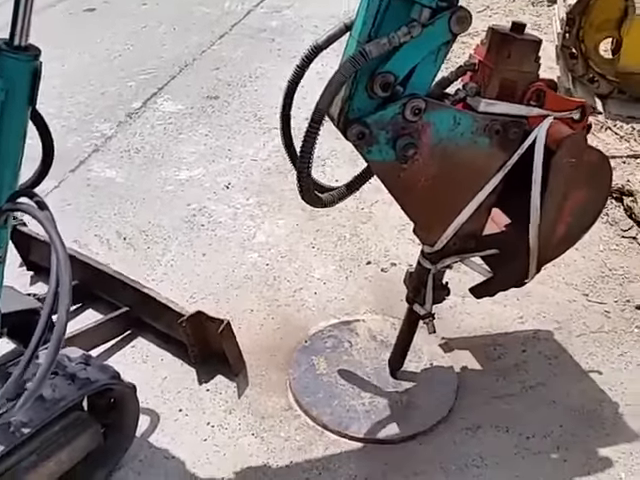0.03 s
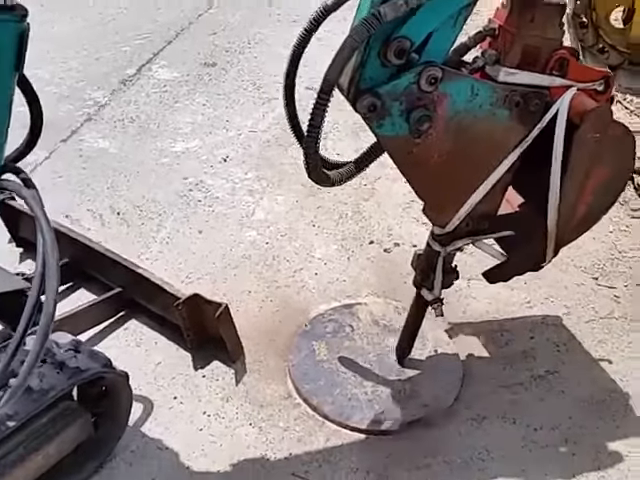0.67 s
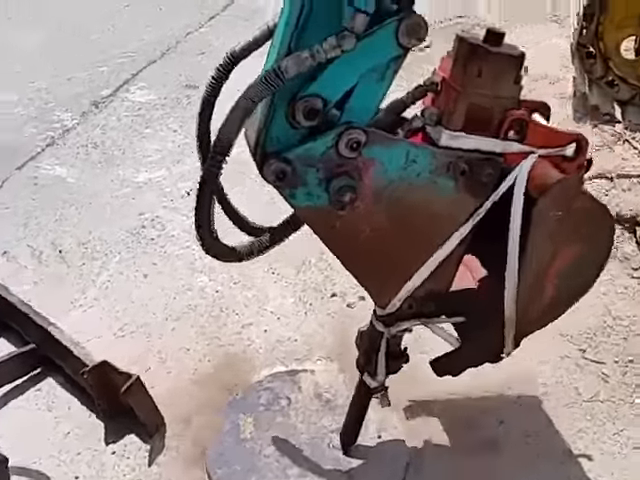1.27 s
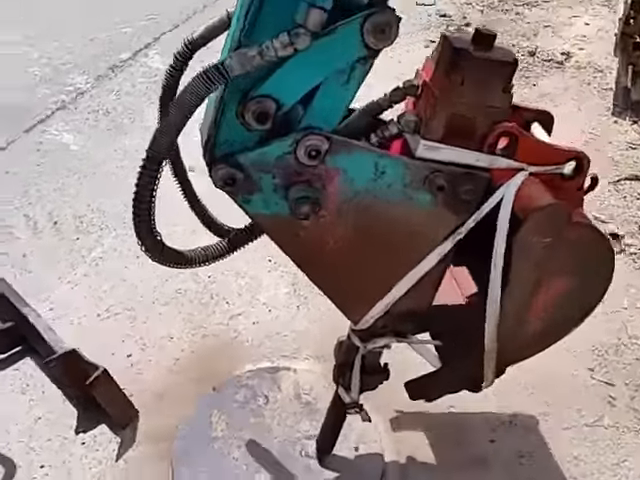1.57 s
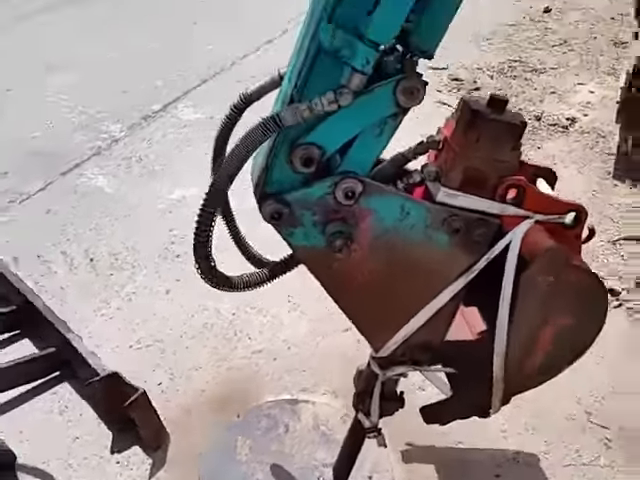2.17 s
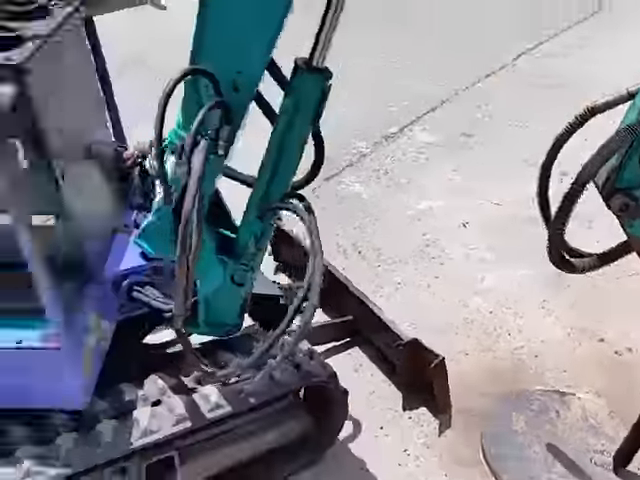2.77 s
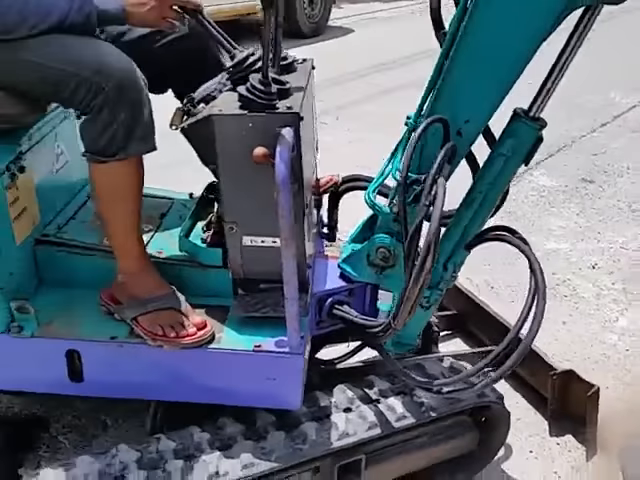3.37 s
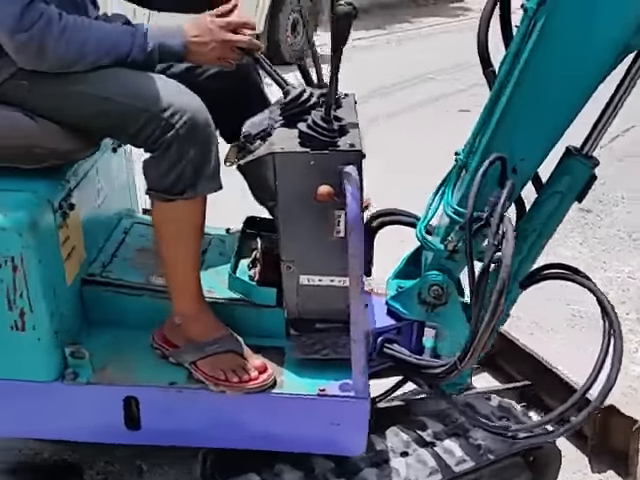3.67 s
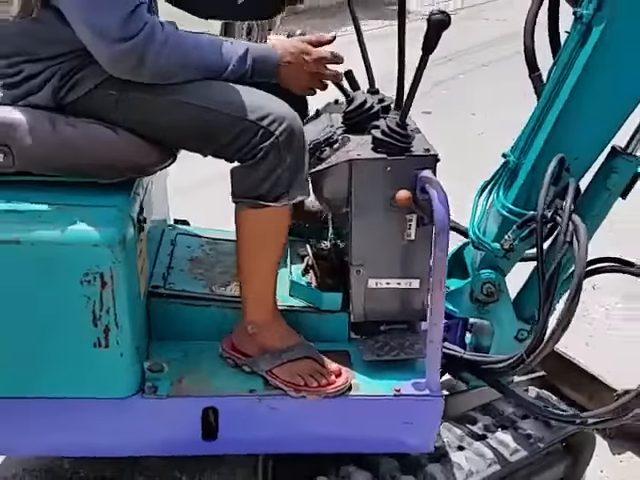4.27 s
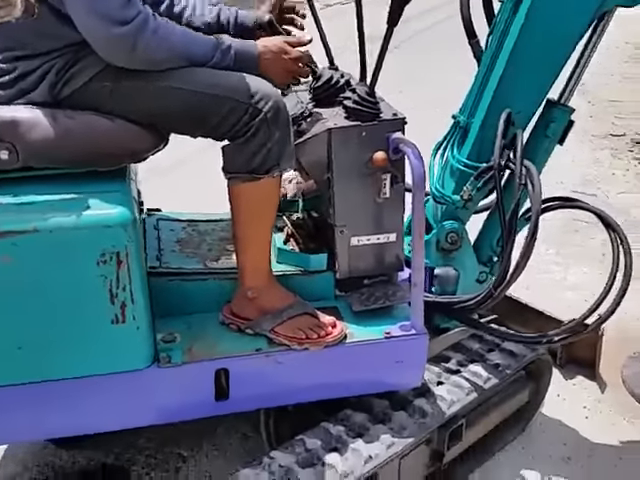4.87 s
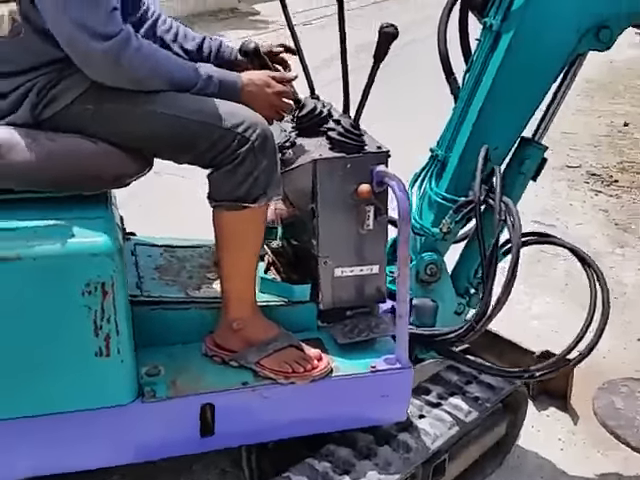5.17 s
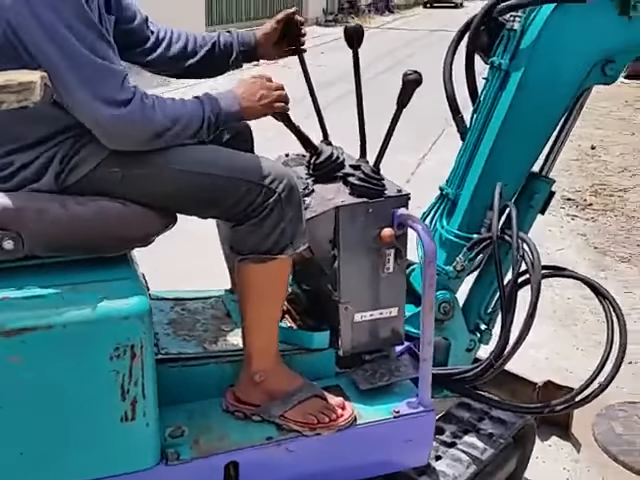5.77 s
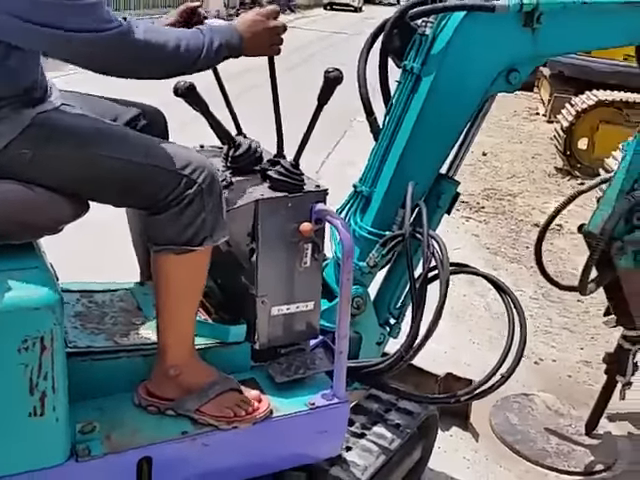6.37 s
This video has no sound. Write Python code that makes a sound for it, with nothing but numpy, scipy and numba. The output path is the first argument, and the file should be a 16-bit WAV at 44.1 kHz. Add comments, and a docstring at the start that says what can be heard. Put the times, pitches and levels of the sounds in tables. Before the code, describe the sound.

A metal knock sounds over the chugging one-cylinder diesel of a mini excavator in a concrete yard. Its hydraulic breaker then hammers a steel plate in two rapid bursts, each blow cracking, thumping and ringing with a short echo. The engine slows slightly under the load. After the second burst fades, the idle grows louder as the phone microphone moves up to the engine.

```python
"""First comes a metal knock over the idling one-cylinder diesel of a mini excavator on a concrete yard.
Then its hydraulic breaker hammers a round steel plate in two bursts: each blow cracks, thumps the
plate on the ground and makes it ring. The engine slows under the load, then grows louder as the
phone moves up to it. The phone's limiter squashes the blows and turns the engine down with them."""
import sys
import numpy as np
from scipy import signal
from scipy.fft import rfft, irfft, next_fast_len
from scipy.io import wavfile
from scipy.ndimage import uniform_filter1d, minimum_filter1d
from numba import njit

SR = 44100
rng = np.random.default_rng(int(sys.argv[2]) if len(sys.argv) > 2 else 0)


def unload_wav(signal):
    """Save mono or channel-first audio to the path in sys.argv[1] as 16-bit WAV at rate SR, clipped to [-1, 1]."""
    wavfile.write(
        sys.argv[1],
        SR,
        np.round(np.clip(np.atleast_2d(signal).T, -1, 1) * 32767).astype(np.int16),
    )


N = 283122
TIME = np.arange(N) / SR
LEFT_RIGHT = np.array([[1], [-1]])

# how often the engine fires: t/s, f/Hz
FIRING_RATE = [(0, 22.25), (.53, 22.2), (.8, 20.9), (1.8, 21), (2.28, 22.1), (2.53, 21.1), (3.5, 21.2),
               (3.9, 22.15), (6.4, 22.08)]
# the phone's walk to the engine: t/s, distance/m, share of the engine hidden by its housing (0-1)
PHONE_PATH = [(2.3, 2.58, 1), (3.6, 4.1, 0.6), (4.1, 2.47, 0.46), (4.7, 2.32, 0.5), (5.0, 1.08, 0.42),
              (5.3, 0.91, 0.35), (5.8, 0.87, 0.2), (6.4, 1.18, 0)]
# exhaust tones (number 24 is the hydraulic gear pump's whine): multiple of the firing rate, level/dB
EXHAUST_TONES = [(1, -78), (2, -37), (3, -4.5), (4, 8.5), (5, -43), (6, -28), (7, 11), (8, -1.5), (9, -39),
                 (10, -15.5), (11, -1), (12, -13), (13, -15.5), (14, -35), (15, -15.5), (16, -8.5),
                 (17, -36), (18, -27), (19, -20), (20, -22.5), (21, -47), (22, -52), (23, -39), (24, -5.5)]
# rush of exhaust gas: f/Hz, level/dB
GAS_COLOUR = [(20, -30), (50, -24), (110, 9.5), (280, -10), (450, -3), (800, -25)]
# engine block and cooling air: f/Hz, level/dB
CLATTER_COLOUR = [(60, -14), (300, -3.5), (480, -11), (800, -2.5), (1020, -6), (1350, -14), (2300, -10),
                  (3500, -14.5), (6500, -22), (9000, -18.5), (12500, -26.5), (14500, -55)]
# air sucked into the engine: f/Hz, level/dB
INTAKE_COLOUR = [(100, -40), (400, -26), (650, -2), (880, 0.5), (1050, -2), (1400, -26), (4000, -30),
                 (14000, -70)]
# knocks and ticks of the boom and chisel: t/s, level/dB, centre f/Hz, width/octaves, fade time/s
BOOM_KNOCKS = [(-.02, -10.5, 1030, 0.59, 0.075), (.136, -20, 1320, 0.99, 0.12),
               (0.604, -26.5, 7100, 1.8, 0.12), (2.373, -34, 10200, 0.24, 0.14)]
# ringing tones of the boom's linkage: f/Hz, level/dB, fade time/s
LINKAGE_TONES = [(582, 3.5, 0.11), (1010, -2, 0.18), (1590, -9.5, 0.17)]
# breaker blows: t/s, level/dB, spot hit (0 middle, 1 towards the rim), plate's time off the ground/s
BREAKER_BLOWS = [(-.11, -21.5, .95, .01), (.806, -7, 0.13, 0.02), (0.881, -8.5, .2, 0.049),
                 (0.958, -13.5, 0.47, 0.051), (1.037, -7, 0.021, 0.057), (1.117, -8, 0.074, .06),
                 (1.197, -9, 0.23, 0.062), (1.276, -6, 0.26, 0.06), (1.382, -13, 0.16, 0.036),
                 (1.496, -12, 0.09, 0.032), (1.592, -2.5, 0.17, 0.02), (1.681, -7, 0.21, 0.014),
                 (1.784, -11.5, 0.17, 0.021), (1.927, -17.5, 0.082, 0.012), (2.105, -24.5, 0.25, 0.019),
                 (2.532, -10.5, 0.19, 0.044), (2.618, -13, 0.2, 0.021), (2.694, -12.5, 0.19, 0.031),
                 (2.772, -11.5, 0.23, 0.071), (2.85, -11.5, 0.75, 0.088), (2.927, -10, 0.6, 0.062),
                 (3.004, -12.5, 0.42, .06), (3.078, -11.5, 0.42, 0.062), (3.158, -16, 0.48, 0.043),
                 (3.233, -9.5, 0.68, 0.075), (3.31, -13.5, 0.5, 0.023), (3.385, -12.5, 0.37, 0.03),
                 (3.47, -18, 0.79, 0.065), (3.574, -21.5, 0.59, 0.05), (3.718, -24.5, 0.43, 0.064),
                 (3.9, -27.5, 0.46, 0.049)]
# crack of the chisel: f/Hz, level/dB
CRACK_COLOUR = [(150, 2.5), (400, 8), (750, 13), (1350, 7), (2300, 8), (4200, 6), (6500, -3.5),
                (9500, -3.5), (14000, -5)]
# plate slapping the concrete: f/Hz, level/dB
THUMP_COLOUR = [(30, -84), (70, -26.5), (130, -18.5), (320, -22), (480, -19.5), (900, -37)]
# plate tones in five families (knock, clank, clang, ring, shimmer): f/Hz, level/dB, fade time/s
PLATE_TONES = [
    [(778, 0, .18), (992, -11, .4), (1105, -9, .3)],
    [(1737, -4, .25), (1855, 0, .27)],
    [(2801, -7, .27), (2941, 0, .32), (3209, -8, .25)],
    [(3908, 0, .45), (4351, 2, .33), (4902, -5, .5), (5147, -2, .48)],
    [(5923, 0, .65), (6505, 0, .5), (6765, -5, .5), (7022, -6, .45), (7625, -5, .4), (8000, 0, .4),
     (8768, 1, .4), (8895, -6, .4), (9293, -3, .6), (9470, -1, .6), (9603, 0, .55), (10895, 0, .45),
     (11225, 0, .5), (11405, -5, .6), (11672, -5, .4), (13400, -12, 0.58), (13470, 0, 0.57)],
]
# how each family answers a blow: level/dB in the middle, change/dB towards the rim
FAMILY_LEVELS = [(-5, -3.5), (-3, 15), (12, -28), (0.5, -8), (-3.5, 2.5)]
# which side the plate's tones come from: f/Hz, left minus right level/dB
PLATE_PAN = [(780, 1.5), (1800, -.5), (2900, -2), (3900, -4.5), (5000, -4.5), (6500, -7.5), (8000, -1),
             (9600, -2), (11200, 1), (14000, 0)]


def undb(db):
    """Turn decibels into a factor to multiply by."""
    return 10 ** (np.asarray(db) / 20)


def unit(x):
    """Scale a sound to an average power of 1."""
    return x / np.sqrt(np.mean(x ** 2))


def fade(age, t60):
    """Die away by 60 dB in t60 seconds, the fade time."""
    return np.exp(-np.log(1000) * age / t60)


def curves(table):
    """Join a table's points in time, giving each column a value at every sample."""
    times, *columns = np.transpose(table)
    return [np.interp(TIME, times, column) for column in columns]


def at_hz(points, hz):
    """Read between (f/Hz, value) points, with octaves evenly spaced."""
    f, value = np.transpose(points)
    return np.interp(np.log(np.maximum(hz, 1)), np.log(f), value)


def noise(colour, likeness):
    """Stereo noise of a given tone colour; likeness 1 makes left and right the same, 0 unrelated."""
    size = next_fast_len(N)
    hz = np.arange(size // 2 + 1) * SR / size
    spectrum = rfft(rng.standard_normal((2, size))) * undb(at_hz(colour, hz))
    mid, side = irfft(spectrum, size)[:, :N]
    return unit(mid) + np.sqrt((1 - likeness) / (1 + likeness)) * unit(side) * LEFT_RIGHT


def wobble(rate):
    """Random values joined by straight lines, rate of them a second."""
    return np.interp(TIME * rate, np.arange(4096), rng.standard_normal(4096))


def yard_echo(sound, echo_db=-11, t60=0.36, gap_s=0.017):
    """Machines and walls around the yard throw back a short echo."""
    age = TIME[:SR // 2]
    tail = rng.standard_normal((2, len(age))) * fade(age, t60) * (age > gap_s)
    tail /= np.sqrt(np.sum(tail ** 2, axis=1, keepdims=True))
    return sound + undb(echo_db) * signal.fftconvolve(sound, tail, axes=1)[:, :N]


def air_intake(phase, open_turn=0.65):
    """The engine takes a short gulp of air in every cycle."""
    gulp = np.exp(2 * (np.cos(phase - 2 * np.pi * open_turn) - 1))
    return gulp * noise(INTAKE_COLOUR, likeness=1)


def block_clatter(phase, knock_turn=0.44, knock_depth=0.066, valve_depth=0.06, grain_db=2):
    """Burning fuel knocks once a cycle, the piston and valves twice."""
    angle = phase - 2 * np.pi * knock_turn
    beat = np.exp(knock_depth * np.cos(angle) + valve_depth * np.cos(2 * angle))
    return beat * undb(grain_db * wobble(500)) * noise(CLATTER_COLOUR, likeness=0.29)


def exhaust_drone(phase, first, last, smear=0.01):
    """A run of exhaust tones; the silencer delays the low ones of each puff."""
    tones = EXHAUST_TONES[first - 1:last]
    return unit(sum(undb(db) * np.cos(k * phase + smear * k ** 2) for k, db in tones))


def diesel(start_turn=0.3043, upper_lag_turn=0.028):
    """Each firing, one full turn of phase, drives the exhaust and shakes clatter out of the block."""
    firing_hz, = curves(FIRING_RATE)
    metres, hidden = curves(PHONE_PATH)
    phase = 2 * np.pi * (np.cumsum(firing_hz) / SR + start_turn + .003 * wobble(22))
    gas = undb(-15) * noise(GAS_COLOUR, likeness=0.047)
    deep = undb(-16.5) * (exhaust_drone(phase, 1, 7) + gas)
    # the housing softens all but the deep part; the upper tones boom out of it a moment later
    upper = undb(-16 - 8.5 * hidden) * exhaust_drone(phase - 2 * np.pi * upper_lag_turn, 8, 24)
    clatter = undb(-20.5 - 5.5 * hidden) * block_clatter(phase)
    air = undb(-20 - 12 * hidden) * air_intake(phase)
    left, right = (deep + upper + clatter + air) / metres
    # the engine stands to the left: the right microphone hears it later and softer
    return np.array([left, undb(-.8) * np.roll(right, 6)])


def boom_knocks(rattle_db=3):
    """The boom's loose joints knock and the chisel grinds on grit; low knocks ring the linkage."""
    out, grid_hz = 0, np.geomspace(30, 20000, 30)
    for start_s, db, centre_hz, octaves, t60 in BOOM_KNOCKS:
        age = np.abs(TIME - start_s)
        colour = np.column_stack([grid_hz, -3 * (np.log2(grid_hz / centre_hz) / octaves) ** 2])
        burst = fade(age, t60) * noise(colour, likeness=0.25) * undb(rattle_db * wobble(400))
        ring = sum(undb(tone_db + at_hz(colour, hz)) * fade(age, ring_t60) * np.sin(2 * np.pi * hz * age)
                   for hz, tone_db, ring_t60 in LINKAGE_TONES)
        out = out + undb(db) * (TIME >= start_s) * (burst + ring)
    return out


def plate_ring(blow, age, since_landing, strength_db, spot, scatter_db=1.2, detune=.0016, rise_s=.002):
    """Each blow stops the plate and rings it anew; the chattering chisel blurs its tones."""
    out = np.zeros((2, N))
    blur = .3 * fade(age, t60=.4)
    rise = 1 - np.exp(-age / rise_s)
    choke = fade(since_landing, t60=.07)
    for tones, (middle_db, rim_db) in zip(PLATE_TONES, FAMILY_LEVELS):
        # blows in the middle clang brightly, blows near the rim clank lower
        family_db = strength_db + middle_db + rim_db * spot
        total = np.sqrt(sum(undb(db) ** 2 for _, db, _ in tones))
        for hz, db, t60 in tones:
            uneven, start_turn, side, load = rng.standard_normal((len(BREAKER_BLOWS), 4)).T
            # the higher the tone, the more it matters just where the chisel lands
            size = undb(family_db + db + scatter_db * uneven * np.sqrt(hz / 1000)) / total
            swing = size[blow] * rise * fade(age, t60) * (1 + blur * wobble(110))
            if hz < 3500:  # the ground chokes the wide swings of the low tones
                swing = swing * choke
            # the chisel's load shifts the pitch a little from blow to blow
            turns = hz * age * (1 + detune * load)[blow] + start_turn[blow]
            phase = 2 * np.pi * turns + blur * wobble(130)
            # short waves reach the two microphones out of step
            skew = 1.1 * side[blow] * min(hz / 4500, 1)
            pan = undb(LEFT_RIGHT * at_hz(PLATE_PAN, hz) / 2)
            out += swing * pan * np.sin(phase + LEFT_RIGHT * skew)
    return out


def chisel_crack(age, rattle_db=5):
    """The chisel hits steel: a sharp snap and a longer rattle."""
    snap = undb(-3) * fade(age, t60=0.046)
    rattle = undb(rattle_db * wobble(350)) * fade(age, t60=0.25)
    return (snap + rattle) * noise(CRACK_COLOUR, likeness=0.14)


def ground_thump(age, strength_db, firm_blow_db=-10, growth=1.64):
    """The plate slaps the concrete; light blows hardly move it."""
    thump_db = growth * (strength_db - firm_blow_db) - 1.5
    return undb(thump_db) * fade(age, t60=0.16) * noise(THUMP_COLOUR, likeness=0.47)


def breaker(crack_db=8, ring_db=13):
    """A piston drives the chisel onto the plate: each blow cracks, thumps and rings."""
    start_s, strength_db, spot, hop_s = np.transpose(BREAKER_BLOWS)
    blow = np.maximum(np.searchsorted(start_s, TIME, side="right") - 1, 0)  # latest blow at each sample
    age = np.abs(TIME - start_s[blow])
    since_landing = np.maximum(age - hop_s[blow], 0)
    cracks = undb(strength_db[blow] + crack_db) * chisel_crack(age)
    thumps = ground_thump(age, strength_db[blow])
    ring = undb(ring_db) * plate_ring(blow, age, since_landing, strength_db, spot)
    return cracks + thumps + ring


def scene():
    """Blows and knocks echo in the yard, over the engine."""
    return yard_echo(breaker() + boom_knocks()) + diesel()


@njit
def follow_peaks(x, release):
    """Jump up to each peak, then sink back slowly."""
    out, level = np.empty(len(x)), 0.
    for i in range(len(x)):
        level += (x[i] - level) * (1. if x[i] > level else release)
        out[i] = level
    return out


def record(dry, limit_db=7.5, release_s=0.19, top_hz=14600):
    """The phone's limiter holds the blows down; the tallest peaks are flattened, the top treble cut."""
    peak = follow_peaks(np.abs(dry).max(axis=0), 1 / (1 + release_s * SR))
    gain = 1 / np.maximum(peak / undb(limit_db), 1)
    gain = uniform_filter1d(minimum_filter1d(gain, size=256), size=256)  # ease down just before a peak
    treble_cut = signal.ellip(10, .2, 80, top_hz, fs=SR, output="sos")
    return signal.sosfilt(treble_cut, np.clip(dry * gain, -1, 1))


dry = scene()
out = record(dry)
unload_wav(out)
```